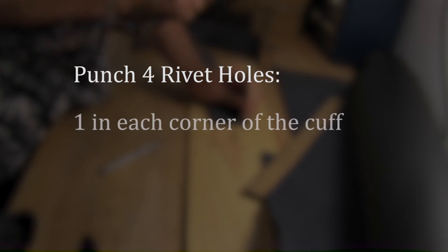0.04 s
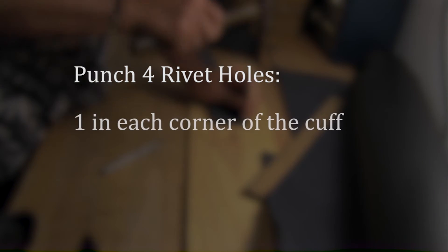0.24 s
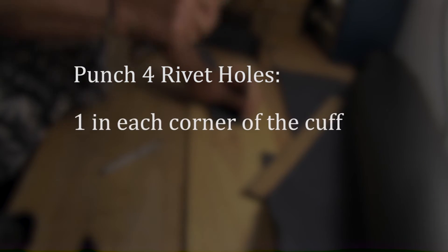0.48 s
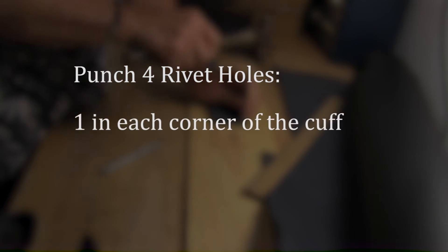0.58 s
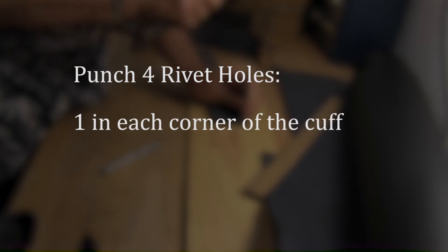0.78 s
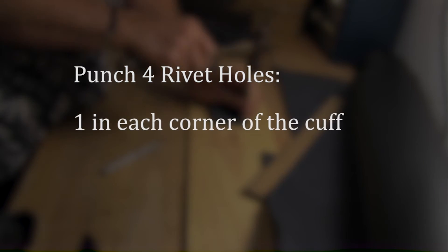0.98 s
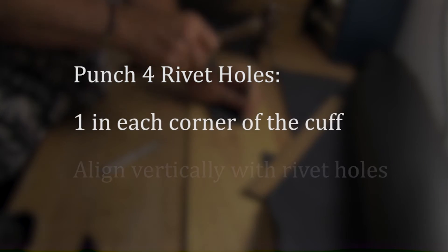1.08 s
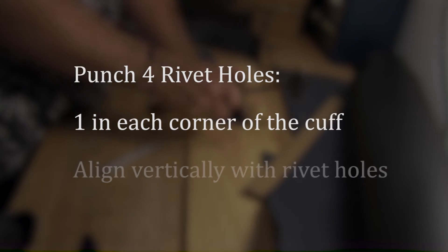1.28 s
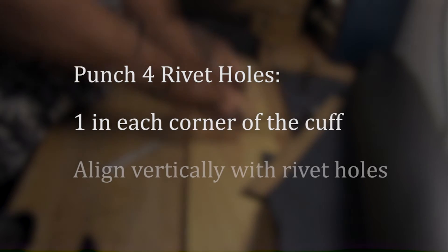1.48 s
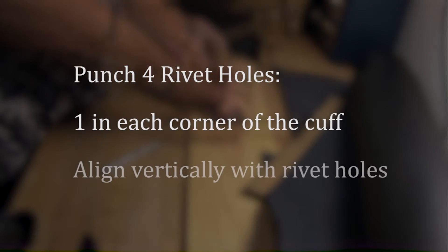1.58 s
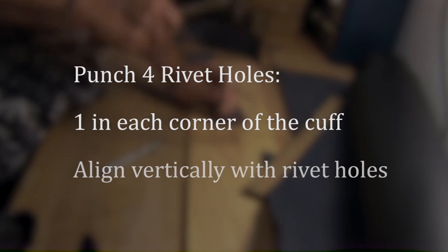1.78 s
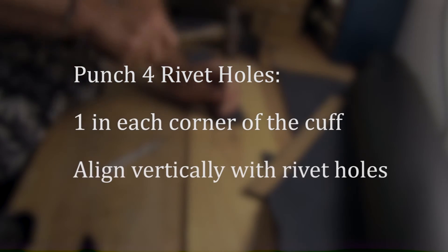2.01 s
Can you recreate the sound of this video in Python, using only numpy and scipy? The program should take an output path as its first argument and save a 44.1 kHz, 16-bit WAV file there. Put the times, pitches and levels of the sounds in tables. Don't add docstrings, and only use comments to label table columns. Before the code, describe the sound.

Hammer blows on a steel punch through leather into a wooden bench. An earlier blow's echo fades at the start, with tiny metallic chatter near 0.2 s. Loud clipped cracks land at 0.25, 0.63 and 1.0 s, with wood knock, high steel ring and small-workshop echo; the level dips, then recovers. Light taps come at 1.35-1.6 s; the echo cuts off at 1.6 s, leaving quiet hiss, dull taps and faint rustle around 1.7 s.

```python
import sys
import numpy as np
from scipy import signal
from scipy.fft import rfft, irfft
from scipy.io import wavfile

SR = 44100
rng = np.random.default_rng(int(sys.argv[2]) if len(sys.argv) > 2 else 0)


def pcm_store(signal):
    levels = np.round(np.clip(np.atleast_2d(signal), -1, 1) * 32767)
    wavfile.write(sys.argv[1], SR, levels.astype(np.int16).T)


def volts_from_decibels(level):
    exponent = np.asarray(level, float) / 20
    return 10 ** exponent


N = 90404

BLOW_TIMES = [
    -.19,
    .2451,
    .6272,
    1.0018,
]
DUCK_DB, RECOVER_S = 26, 0.18


def evened(x):
    return x / np.sqrt(np.mean(x ** 2) + 1e-20)


def read(points, hz):
    f, value = np.transpose(points)
    return np.interp(np.log(hz + 1), np.log(f + 1), value)


def add(mix, s, sound):
    at = round(s * SR)
    part = mix[..., max(at, 0):][..., :sound.shape[-1] - max(-at, 0)]
    part += sound[..., max(-at, 0):][..., :part.shape[-1]]


def colour(x, gain):
    size = x.shape[-1]
    return irfft(rfft(x) * gain(np.fft.rfftfreq(size, 1 / SR)), size)


def peak(f, hz, width_hz):
    return 1 / (1 + ((f - hz) / width_hz) ** 2)


def ring(modes, size, rise=0.091):
    t = np.arange(size) / SR
    total = 0
    for hz, db, t60 in modes:
        fade = volts_from_decibels(db - 60 * t / max(t60, .003))
        swell = 1 - np.exp(-t * hz / rise)
        total = total + fade * swell * np.sin(2 * np.pi * hz * t)
    return total


def pair(mid, other, side_table):
    side = colour(other, lambda f: volts_from_decibels(read(side_table, f)))
    return np.array([mid + side, mid - side])


def room_tone():
    # pitch_hz, level_db (per Hz)
    floor_tone = [(25, -14), (60, 5), (110, -10), (260, -14), (1280, -25.5), (6000, -32),
                  (9500, -39), (14100, -43), (14450, -70)]
    # pitch_hz, side_minus_mid_db
    width_table = [(60, -68), (110, -12), (200, -36), (380, -7), (700, -11), (1290, -11), (2380, -13.5),
                   (4400, -11.5), (8120, -18), (15000, 10)]
    whine_hz, whine_width_hz = 7670, 600
    rustle_s, rustle_len_s = 1.665, .04
    hush = []
    for noise in rng.standard_normal((2, N)):
        floor = evened(colour(noise, lambda f: volts_from_decibels(read(floor_tone, f))))
        whine = evened(colour(noise[::-1], lambda f: 1 / (1 + ((f - whine_hz) / whine_width_hz) ** 4)))
        hush.append(volts_from_decibels(-51.5) * floor + volts_from_decibels(-61.5) * whine)
    brush = np.exp(-.5 * ((np.arange(N) / SR - rustle_s) / rustle_len_s) ** 2)
    cloth = evened(colour(rng.standard_normal(N), lambda f: f / (f + 3000) / (1 + (f / 8000) ** 6)))
    return pair(hush[0] + volts_from_decibels(-60) * brush * cloth, hush[1], width_table)


def tap(db, top_hz, length_s):
    noise = rng.standard_normal(8192)
    t = np.arange(len(noise)) / SR
    body = evened(colour(noise, lambda f: f / (f + 200) ** 2.12 / (1 + (f / top_hz) ** 4)))
    return volts_from_decibels(db - 20 * t / length_s) * np.minimum(t / 0.0038, 1) * body


def chatter(db):
    # pitch_hz, width_hz, level_db
    punch_ring = [(530, 140, 2.5), (2500, 120, -1), (4530, 490, -1), (8800, 700, -13.5), (12500, 790, -20)]
    noise = rng.standard_normal(4096)
    t = np.arange(len(noise)) / SR
    body = evened(colour(noise, lambda f: sum(volts_from_decibels(d) * peak(f, hz, w) for hz, w, d in punch_ring)))
    return volts_from_decibels(db - 60 * t / .025) * np.minimum(t / 0.00028, 1) * body


def workshop(noise):
    # pitch_hz, level_db (per Hz)
    echo_tone = [(25, -32.5), (60, 4), (130, 0.5), (300, -12.5), (1200, -21), (3500, -26), (11500, -34),
                 (13000, -45.5), (16000, -56)]
    # pitch_hz, t60_s
    echo_fade = [(60, 0.45), (130, 0.92), (300, 0.27), (1000, 0.29), (3000, 0.31), (8000, 0.31),
                 (15000, 0.32)]
    late_db, late_t60_s, late_top_hz = -14, 2.86, 2200
    hz, t, z = signal.stft(noise, SR, nperseg=1024, noverlap=896)
    shape = volts_from_decibels(read(echo_tone, hz))[:, None]
    shape = shape / np.sqrt(np.mean(shape ** 2))
    since = t - RECOVER_S
    near = volts_from_decibels(-60 * since / read(echo_fade, hz)[:, None])
    late = volts_from_decibels(late_db - 60 * since / late_t60_s) / (1 + (hz[:, None] / late_top_hz) ** 4)
    shape = shape * volts_from_decibels(-DUCK_DB) * np.hypot(near, late)
    tail = signal.istft(z * shape, SR, nperseg=1024, noverlap=896)[1][:, :SR]
    return tail * (1 - np.exp(-np.arange(SR) / SR / 0.0024))


def wood_knock():
    wood_pitches = [113, 198, 289, 360, 400, 432, 500, 600, 724, 886, 1080, 1385, 2180, 2850]
    # level_db, t60_s
    wood_levels = [(-8.5, 0.24), (-3, 0.14), (-2, 0.11), (-7.5, 0.26), (0.5, .13), (-0.5, .12), (-5, 0.13),
                   (-0.5, 0.072), (4, 0.036), (-1, 0.027), (6.5, 0.026), (-7, 0.1), (-6.5, 0.039),
                   (1.5, 0.02)]
    # pitch_hz, level_db, t60_s
    bench_hum = [(277.1, -34.5, 0.79), (379.4, -43.5, 1), (189.3, -28, 0.27)]
    # pitch_hz, level_db, t60_s
    drop_back = [(111.7, -7, 0.53), (146.3, -0.5, 0.21), (58, -27, 0.1)]
    modes = [(hz, *row) for hz, row in zip(wood_pitches, wood_levels)]
    wood = -volts_from_decibels(9.5) * ring(modes + bench_hum, size=SR, rise=0.37)
    add(wood, .15, volts_from_decibels(-22.5) * ring(drop_back, size=SR))
    return wood


def crack(tools):
    # pitch_hz, level_db
    crack_tone = [(300, -30), (600, -8), (1100, -2), (3500, -9), (5500, -6), (11000, -11), (13500, -22),
                  (16000, -38)]
    noise = rng.standard_normal((2, SR))
    burst = evened(colour(noise, lambda f: tools(f) * volts_from_decibels(read(crack_tone, f))))
    return burst * volts_from_decibels(15 - 60 * np.arange(SR) / SR / .028)


def steel_ring(low_db, high_db):
    t = np.arange(SR) / SR
    waver = evened(colour(rng.standard_normal((2, SR)), lambda f: peak(f, 0, 60)))
    strength = 1 + .6 * waver * np.minimum(t / 0.029, 1)
    low = volts_from_decibels(low_db) * np.sin(2 * np.pi * 10945 * t)
    high = volts_from_decibels(high_db) * np.sin(2 * np.pi * 11710 * t)
    return strength * (low + high) * volts_from_decibels(-60 * t / .33)


def blow(db, low_db, high_db, face, same):
    # pitch_hz, side_minus_mid_db
    width_table = [(60, -28), (110, -72), (200, -38), (380, -34), (700, -29), (1290, -34), (2380, -29.5),
                   (4400, -27.5), (8120, -15), (15000, -12.5)]

    def tools(f):
        return 1 + sum((volts_from_decibels(d) - 1) * peak(f, hz, 300) for hz, d in face)

    def share(f):
        return 1 / (1 + (f / 1040) ** 2)

    fresh = rng.standard_normal((2, SR))
    noise = colour(same, lambda f: np.sqrt(share(f)))
    noise = noise + colour(fresh, lambda f: tools(f) * np.sqrt(1 - share(f)))
    air = workshop(noise) + crack(tools) + steel_ring(low_db, high_db)
    rise = np.minimum(np.arange(SR) / SR / .0011, 1) ** 2
    return volts_from_decibels(db) * (pair(air[0], air[1], width_table) * rise + wood_knock())


def scene():
    # strength_db, low_steel_db, high_steel_db
    strengths = [
        (-7.5, -27, -36),
        (-0.5, -46, -32),
        (0.5, -26, -15),
        (0.5, -13, -51),
    ]
    # pitch_hz, level_db (over plain noise)
    faces = [
        [(3300, 6), (4500, 13), (6700, 8), (8600, 12), (9950, 11), (13100, 13)],
        [(4300, 5), (6000, 11), (7200, 8), (10400, 11), (13200, 12), (15400, 12)],
        [(4400, 6), (6400, 8), (7400, 9), (8600, 6), (10900, 9), (13700, 7)],
        [(2600, 4), (4600, 5), (6700, 7), (8500, 9), (10950, 10), (15400, 12)],
    ]
    # start_s, level_db
    slips = [
        (.170, -50),
        (.1775, -41),
        (.185, -41),
        (.192, -42),
        (.203, -52),
    ]
    # start_s, level_db, top_hz, length_s
    touches = [
        (0.554, -36, 335, 0.071),
        (1.348, -38, 500, 0.027),
        (1.492, -39.5, 600, 0.057),
        (1.553, -34.5, 3800, 0.028),
        (1.581, -35.5, 1000, 0.017),
        (1.645, -52, 400, 0.025),
        (1.688, -37.5, 660, 0.014),
        (1.698, -45, 650, 0.042),
    ]
    change_s = 1.593
    mix, same = np.zeros((2, N)), rng.standard_normal((2, SR))
    for s, strength, face in zip(BLOW_TIMES, strengths, faces):
        sound = blow(*strength, face, same)
        add(mix, s, sound)
        add(mix, s - .002, volts_from_decibels(-50) * sound)
    mix = mix * (np.arange(N) < change_s * SR) + room_tone()
    for s, db in slips:
        add(mix, s, chatter(db))
    for s, *touch in touches:
        longest = round((change_s - s) % 1 * SR)
        add(mix, s, tap(*touch)[:longest])
    return mix


def band_limit(x):
    return signal.sosfilt(signal.butter(12, 16870, fs=SR, output="sos"), x)


def record(dry):
    def mic(f):
        return f ** 2 / (f ** 2 + 42 ** 2) / (1 + (f / 15750) ** 60)

    clip = 0.58
    since = np.arange(N) / SR - np.array(BLOW_TIMES)[:, None]
    duck = np.clip(since / .0018, 0, 1) * np.clip(1 - since / RECOVER_S, 0, 1)
    ducked = dry * volts_from_decibels(-DUCK_DB * duck.max(axis=0))
    return band_limit(colour(clip * np.tanh(ducked / clip), mic))


dry = scene()
out = record(dry)
pcm_store(out)
```